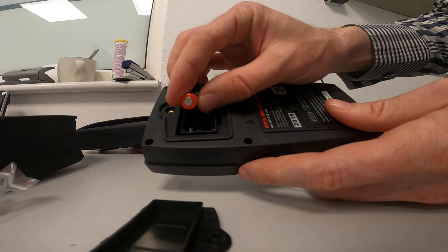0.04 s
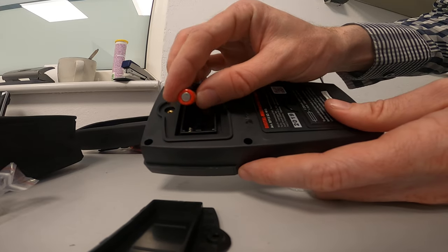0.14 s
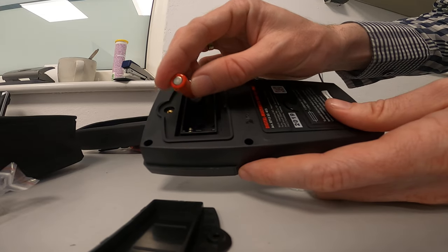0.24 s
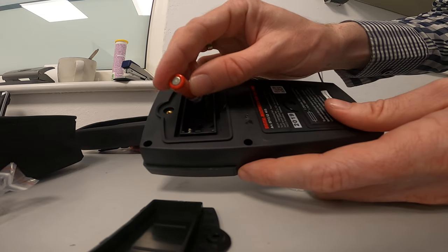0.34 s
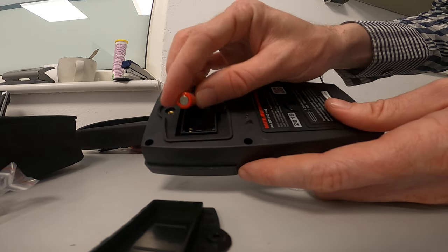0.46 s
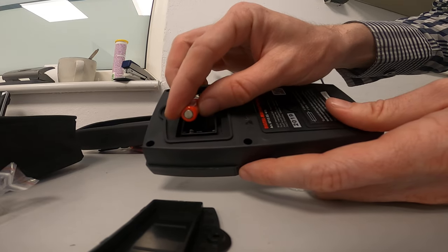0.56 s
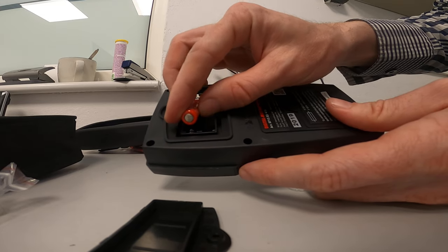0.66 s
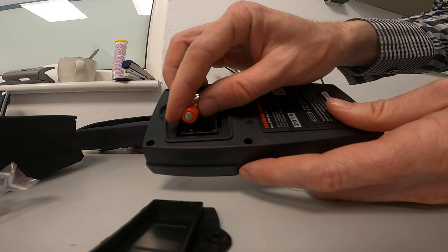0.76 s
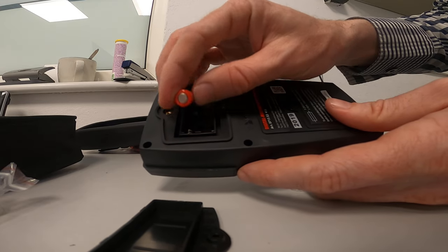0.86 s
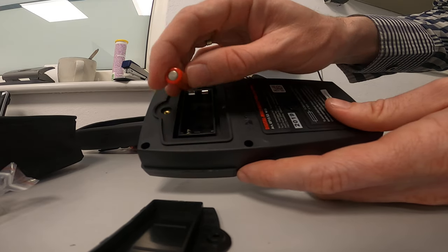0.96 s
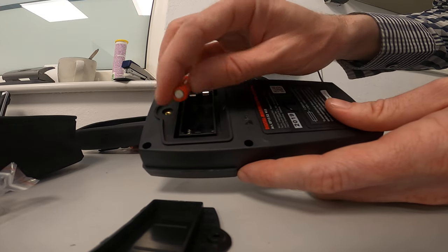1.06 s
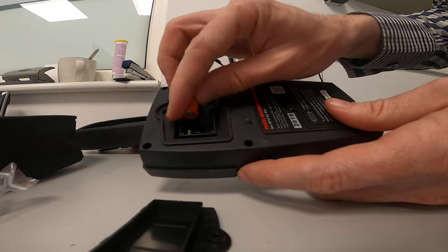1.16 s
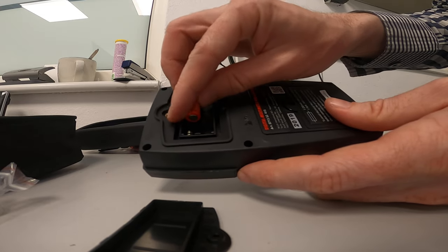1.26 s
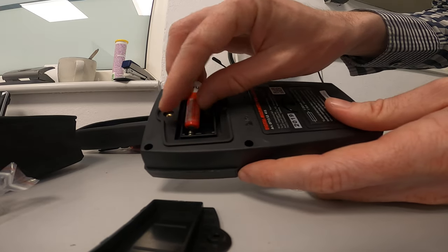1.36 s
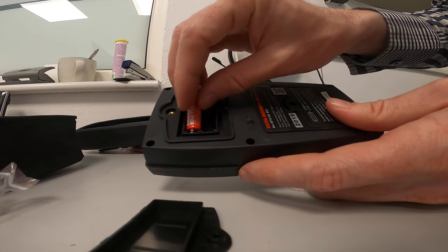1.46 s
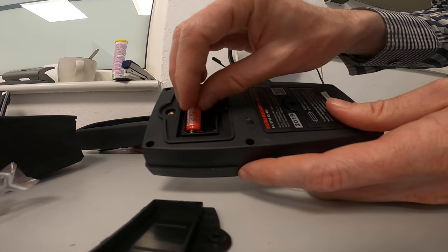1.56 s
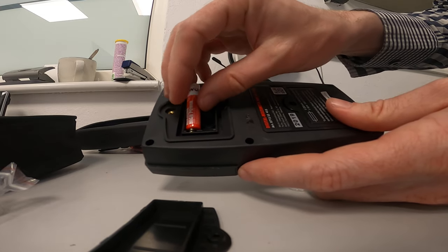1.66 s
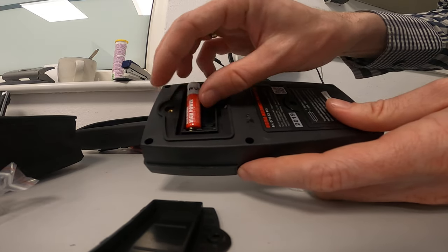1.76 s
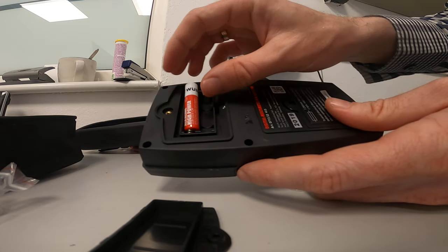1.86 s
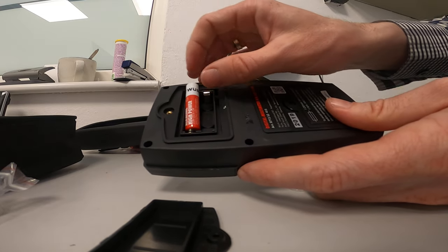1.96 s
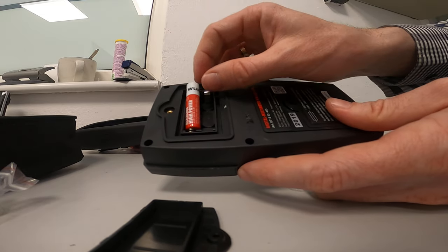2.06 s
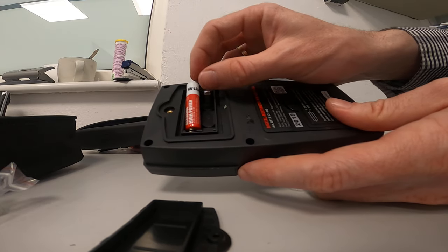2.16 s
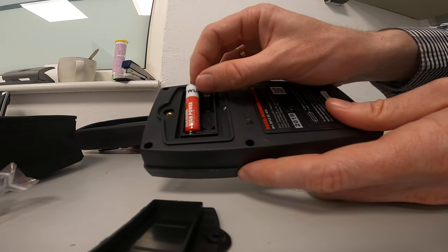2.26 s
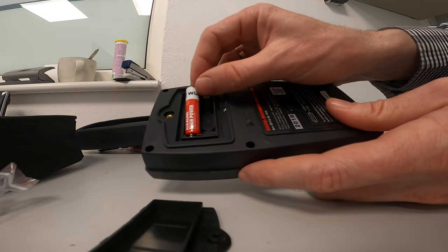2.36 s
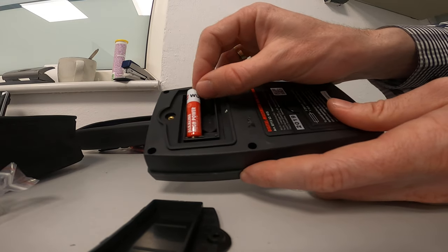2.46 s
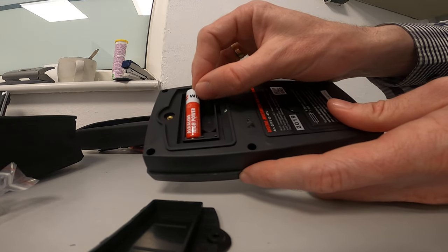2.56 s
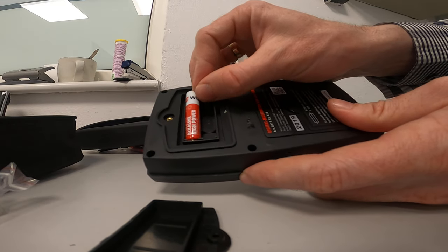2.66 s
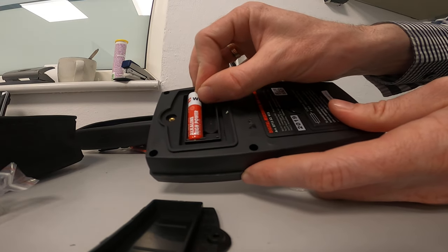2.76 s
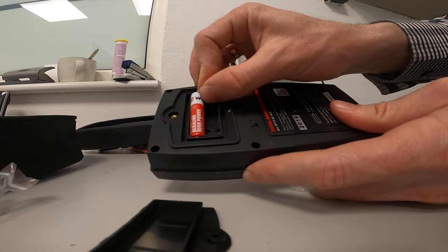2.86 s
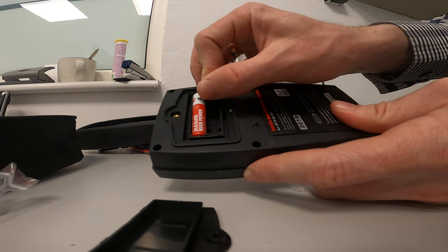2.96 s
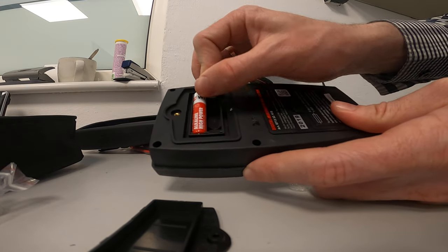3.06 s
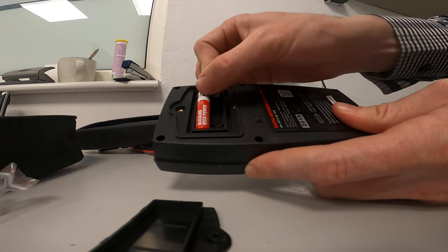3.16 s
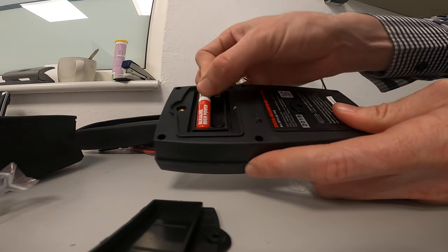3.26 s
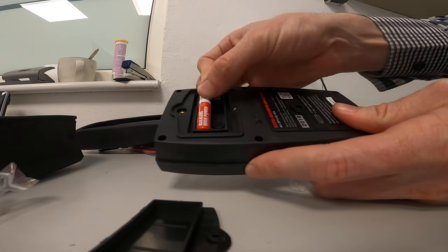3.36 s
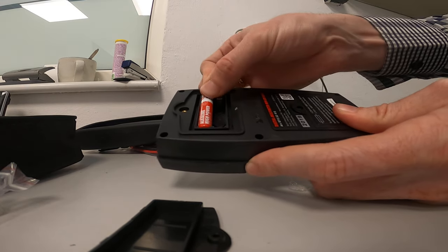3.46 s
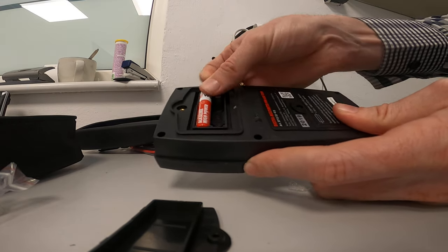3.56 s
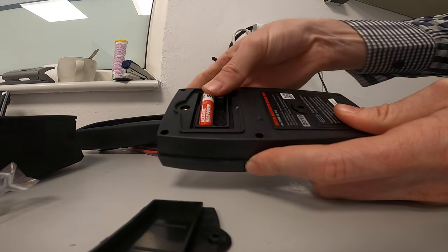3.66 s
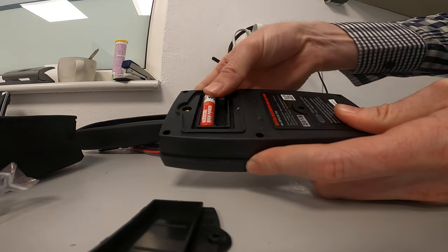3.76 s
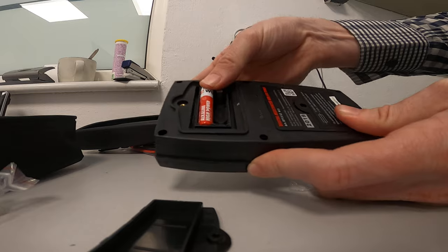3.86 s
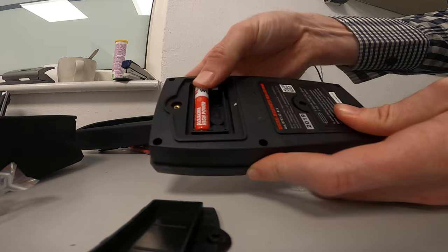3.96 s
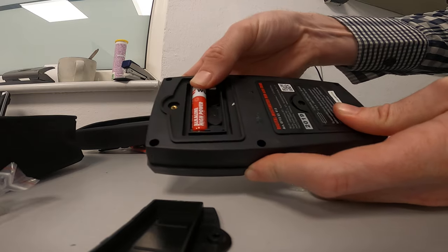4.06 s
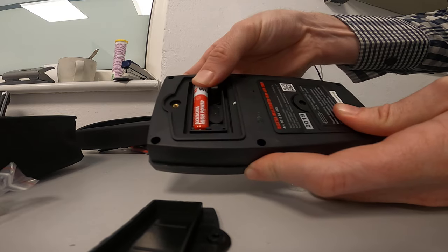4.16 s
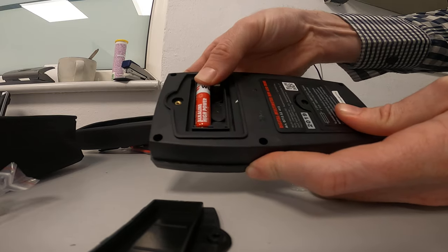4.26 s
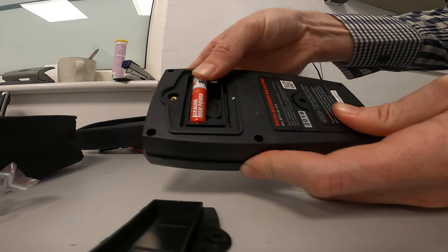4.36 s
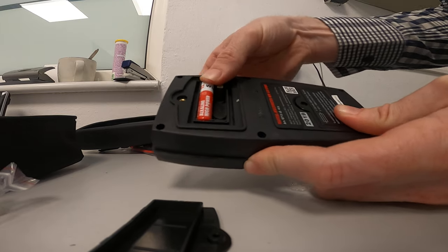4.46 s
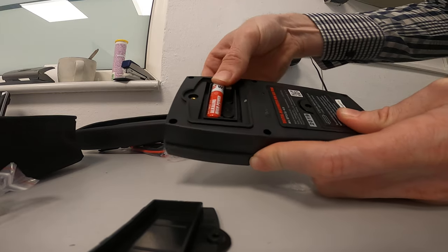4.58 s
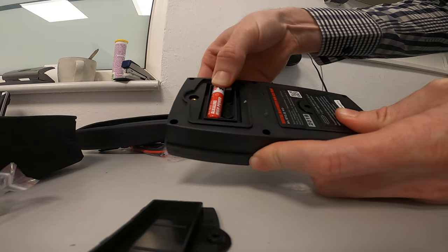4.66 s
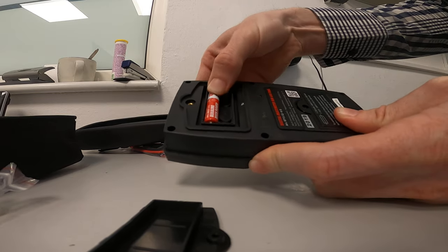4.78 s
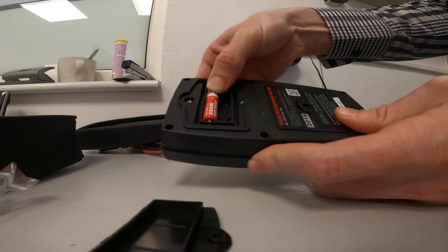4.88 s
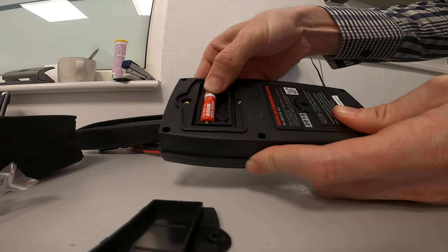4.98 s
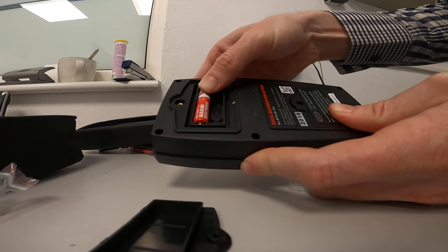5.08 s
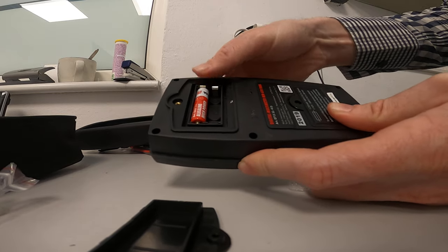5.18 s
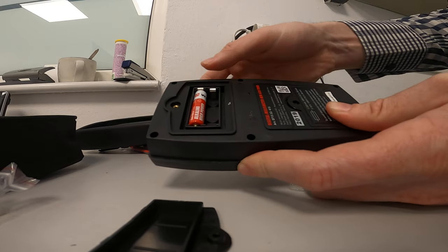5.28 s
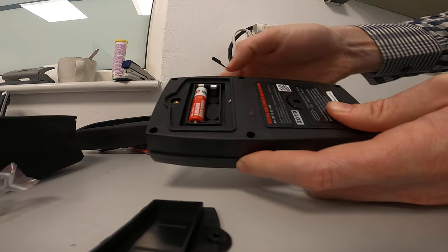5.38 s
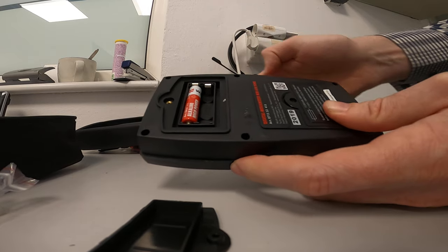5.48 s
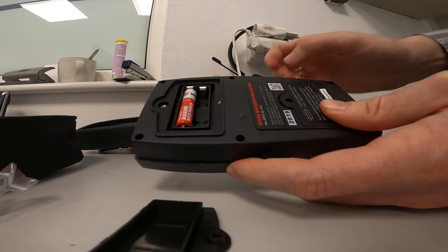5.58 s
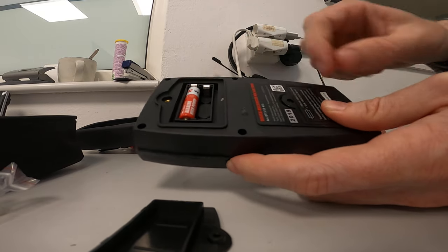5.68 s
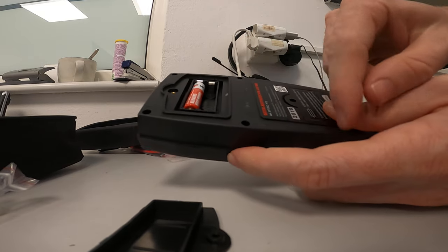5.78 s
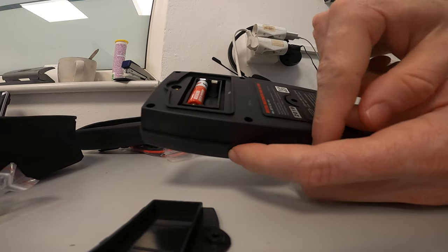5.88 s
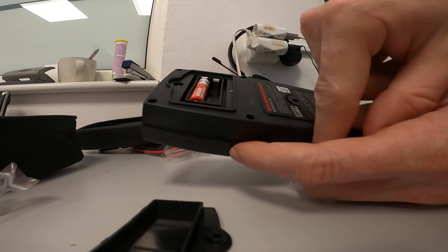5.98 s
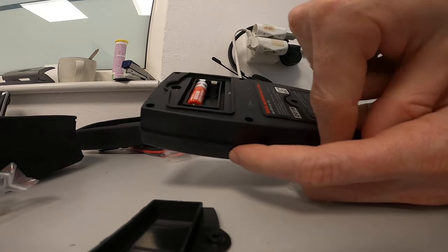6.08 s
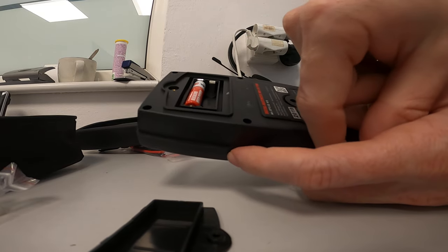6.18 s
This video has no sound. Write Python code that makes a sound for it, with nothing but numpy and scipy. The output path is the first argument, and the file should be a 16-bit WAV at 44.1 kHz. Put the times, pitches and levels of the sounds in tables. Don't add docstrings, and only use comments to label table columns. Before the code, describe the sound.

Low ventilation rumble and faint fan hum fill a small hard room throughout, with a small microphone close by on the desk. A light tap opens, a nail tick follows at 0.1 s, and soft pats come from 0.3 to 0.76. At 0.97 a quick triple knock rings the plastic case. Around 1.34 to 1.57 knocks crowd together into loud clacks with springy rattle, and a harder one hits at 1.85 amid scuffing. Until 2.9 there are only small ticks and rubs. Medium knocks land at 2.95, 3.1 and 3.37, lighter ones at 3.98 and 4.5, with skin and cell dragging between. From 4.87 rapid slips grow into a very loud, sharp snap at 4.91, with a desk thump and short room clap. The level ducks and recovers by about 5.1; soft brushing and faint ticks continue to 6.2.

```python
import sys
import numpy as np
from scipy import signal
from scipy.fft import rfft, irfft, next_fast_len
from scipy.io import wavfile
from scipy.ndimage import uniform_filter1d

SR = 44100
rng = np.random.default_rng(int(sys.argv[2]) if len(sys.argv) > 2 else 0)


def generate_wav(signal):
    frames = np.transpose(np.atleast_2d(signal))
    scaled = np.clip(frames, -1, 1) * 32767
    pcm = np.round(scaled).astype(np.int16)
    wavfile.write(sys.argv[1], SR, pcm)


def field_ratio(decibels):
    return 10 ** (np.asarray(decibels, dtype=float) / 20)


N = 274743
T = np.arange(N) / SR
HZ = np.fft.rfftfreq(N, 1 / SR) + 1e-3
SIDES = np.array([[1], [-1]])
SNAP_S = 4.9095

# pitch in Hz, level in dB, ring time as a factor.
CASE_MODES = [(380, -9, 6.3), (530, -11, 5), (703, -7, 2.6), (772, -10, 2.2), (932, -6.5, 2.8),
              (1060, -4, 2), (1145, 5, 0.8), (1205, 1, 1.1), (1480, 0, 1.1), (1680, 7.5, 0.37),
              (1772, 0, 1.3), (2054, 10, 0.28), (2226, -1.5, 1.2), (2620, -3, 0.47), (2940, 3.5, 0.83),
              (3180, -5, 2), (3702, 6, 0.78), (4180, 6, 0.87), (5100, 7, 0.21), (6788, -6, .2),
              (7460, 17.5, .2), (8150, -10, .15), (10000, -17.5, .1)]


def unit(x):
    return x / np.sqrt(np.mean(x ** 2))


def on_hz(table):
    hz, value = np.transpose(table)
    return np.interp(np.log(HZ), np.log(hz), value)


def on_time(table):
    s, value = np.transpose(table)
    return np.interp(T, s, value)


def bell(hz, octaves):
    return np.exp(-.5 * (np.log2(HZ / hz) / octaves) ** 2)


def band(x, hz, octaves):
    return irfft(rfft(x) * bell(hz, octaves), N)


def band_edges(centre_hz, octaves):
    return centre_hz * 2 ** (octaves * np.array([-1, 1]))


def walk(rate):
    hold = int(SR / rate)
    steps = np.repeat(rng.standard_normal(N // hold + 1), hold)
    return .45 * uniform_filter1d(uniform_filter1d(steps, hold), hold)[:N]


def decay(t, t60):
    return np.exp(-np.log(1000) * t / t60)


def ring(hz, gain, t60, size):
    t = np.arange(size) / SR
    hz, gain, t60 = (np.reshape(v, (-1, 1)) for v in (hz, gain, np.maximum(t60, .002)))
    return np.sum(gain * np.sin(2 * np.pi * hz * t) * decay(t, t60), axis=0)


def case_ring(centre_hz, spread, ring_s, chance):
    hz, db, factor = np.transpose(CASE_MODES)
    distance = np.log2(hz / centre_hz) / max(spread, .15)
    weight = field_ratio(db - 2.84 * distance ** 2 + 2.0 * chance[0])
    sign = (-1) ** np.arange(len(hz)) * np.where(chance[2] > 1.3, -1, 1)
    return ring(hz * (1 + 0.009 * chance[1]), sign * weight, ring_s * factor, size=3072)


def add(out, s, sound):
    i = max(int(s * SR), 0)
    sound = sound[..., :N - i]
    out[..., i:i + sound.shape[-1]] += sound


def pair():
    # pitch in Hz, likeness of left and right from 0 to 1.
    likeness = [(60, 0.96), (130, 0.8), (290, 0.88), (640, 0.5), (1410, 0.4), (3100, 0.01), (6820, 0),
                (15000, 0)]
    alike = np.clip(on_hz(likeness), 0, 1)
    mid, side = rfft(rng.standard_normal((2, N)))
    return np.sqrt(1 + alike) * mid + np.sqrt(1 - alike) * side * SIDES


def air():
    # pitch in Hz, level in dB per Hz.
    hiss_colour = [(53, -26.5), (90, -7.5), (158, 3.5), (222, -7), (282, -6.5), (407, -16.5), (504, -18.5),
                   (562, -21.5), (727, -22), (810, -24), (2050, -26), (3660, -41.5), (7610, -42.5),
                   (15500, -68)]
    # time in seconds, level in dB.
    rumble_swell = [(0, -46), (.68, -44), (1.28, -52), (1.91, -51), (2.46, -50), (2.58, -52.5),
                    (3.14, -48.5), (3.35, -55.5), (3.99, -37), (4.15, -44.5), (4.44, -45), (4.56, -39.5),
                    (4.8, -51), (4.94, -28.5), (5.17, -53.5), (5.29, -45), (5.6, -46), (6.23, -44)]
    rumble_colour = [(8, -9.5), (25, 5.5), (45, 6.5), (65, 6.5), (85, -8.0), (120, -8.0), (200, -77.0)]  # Hz, dB
    noise = pair()
    hiss = unit(irfft(noise * field_ratio(on_hz(hiss_colour)) * (HZ > 80), N))
    rumble = unit(irfft(noise * field_ratio(on_hz(rumble_colour)), N))
    return hiss * field_ratio(-58.5 + 0.57 * walk(4.3)) + rumble * field_ratio(on_time(rumble_swell) + 2.0 * walk(52))


def hum():
    # pitch in Hz, width in Hz, level in dB.
    tones = [
        (147.3, 5.8, -61),
        (203.1, 17, -63.5),
        (12000, 120, -106),
    ]
    out = np.zeros((2, N))
    for hz, width, db in tones:
        out += field_ratio(db + 2.0 * walk(5)) * unit(band(rng.standard_normal(N), hz, width / hz / 2))
    return out


def tiny_slips():
    stronger_db = 2.5 * rng.exponential(size=N) * (rng.random(N) < .05)
    mid, side = rng.standard_normal((2, N)) * field_ratio(stronger_db)
    return (mid + 0.59 * side * SIDES) * field_ratio(1.4 * walk(63))


def case_hum(slips, centre_hz, spread, ring_s):
    still = np.zeros((3, len(CASE_MODES)))
    answer = case_ring(centre_hz, spread, ring_s, still)
    return unit(signal.fftconvolve(slips, [answer])[:, :slips.shape[1]])


def handling(slips, hiss):
    # time in seconds, level in dB.
    busyness = [(0, -63), (.3, -86), (.7, -74), (.95, -90), (1.4, -77), (1.55, -84), (2.0, -70), (2.2, -96),
                (2.45, -100), (2.65, -70), (2.97, -91), (3.09, -69), (3.4, -84.5), (3.92, -65), (4.3, -76),
                (4.8, -68.5), (5.3, -70), (6.23, -76.5)]
    hiss_db = -16
    return field_ratio(on_time(busyness)) * (case_hum(slips, 1500, 0.7, 0.002) + field_ratio(hiss_db) * hiss)


def strokes(slips, hiss):
    # start in seconds, length in seconds, level in dB, centre in Hz.
    drags = [(.318, 0.027, -60.5, 1820), (.882, 0.22, -56.5, 1270), (2.375, 0.041, -60, 750),
             (2.504, 0.053, -62, 990), (2.715, 0.029, -51.5, 1370), (2.762, 0.34, -68, 1100),
             (2.93, 0.046, -57, 1308), (3.386, 0.068, -56, 980), (3.672, 0.06, -57.5, 900),
             (3.886, 0.031, -52, 1300), (4.056, 0.045, -50.5, 1200), (4.246, 0.092, -57, 1012),
             (4.532, 0.0286, -43.5, 1140), (4.615, .12, -51, 1610), (4.714, 0.097, -51.5, 1200),
             (5.915, 0.14, -62, 1050), (1.494, 0.089, -46.5, 1400), (5.93, .06, -66, 1650),
             (1.835, .02, -52.5, 2500), (5.7, .06, -69, 1480)]
    # start in seconds, length in seconds, level in dB, centre in Hz.
    scuffs = [(.47, 0.15, -85, 2480), (.558, 0.15, -70, 1930), (1.776, 0.18, -53, 1420),
              (3.655, 0.041, -51, 2330), (3.854, 0.024, -70.5, 1790), (3.963, 0.033, -49, 2000),
              (4.461, 0.098, -59, 1540), (5.382, 0.17, -69, 1820), (5.52, 0.053, -61.5, 2000),
              (5.97, 0.11, -71, 1490), (1.901, 0.042, -52, 2950)]
    # start in seconds, length in seconds, level in dB, centre in Hz.
    swipes = [(.0, 0.013, -51, 1970), (.799, 0.06, -73, 2470), (.987, 0.077, -65, 2190),
              (1.372, 0.092, -74, 1200), (2.559, .051, -71, 1780), (2.993, 0.037, -73, 1200),
              (3.278, 0.1, -70.5, 1117), (5.303, 0.035, -64.5, 1108), (6.2, 0.042, -62, 2580),
              (.87, 0.033, -82, 2540)]
    out = np.zeros((2, N))
    for table, hiss_db in ((drags, -38), (scuffs, -19.5), (swipes, -5.5)):
        for s, length, db, centre_hz in table:
            span = slice(max(int(s * SR), 0), int((s + max(length, .01)) * SR))
            body = case_hum(slips[:, span], centre_hz, .4, .012)
            swell = np.hanning(body.shape[1]) ** 0.56
            out[:, span] += swell * field_ratio(db) * (body + field_ratio(hiss_db) * hiss[:, span])
    return out


def brushes(slips):
    # start in seconds, length in seconds, level in dB, centre in Hz, width in octaves.
    passes = [(0.98, .075, -72, 10700, .35), (1.39, .05, -78, 8100, .2), (1.4984, 0.082, -66, 7200, 0.13),
              (1.774, 0.032, -68.5, 8000, .15), (1.9, 0.04, -66, 8700, 0.15), (5.92, 0.17, -80, 11500, .4),
              (5.9, 0.22, -75, 6500, 0.6), (4.93, .21, -41, 110, .6), (5.04, .15, -47, 1000, .15),
              (5.04, .17, -47, 1680, .1), (5.92, .1, -66, 1050, .06), (3.82, .08, -78, 7000, .6),
              (.8, .05, -76.5, 5000, .12), (.87, .05, -76.5, 5200, .15), (.875, .04, -80, 8000, .12),
              (1.0, .07, -72, 5300, .15), (1.55, .03, -58.5, 7700, .1), (3.385, .1, -74, 6800, .25),
              (2.6, .17, -57, 350, 0.53), (5.68, 0.083, -60.5, 340, 0.5), (0.49, 0.23, -71, 2370, 0.42),
              (1.85, 0.28, -56, 1800, .25), (1.86, .16, -68, 4800, .35), (4.758, .04, -53, 750, .2),
              (4.48, .03, -68, 7000, .15), (4.63, .09, -72, 7900, .08), (3.88, .2, -64, 700, .25),
              (0, .03, -58, 320, .2), (3.45, 0.9, -86, 7800, .06), (4.27, 0.067, -74, 7800, .08),
              (2.7, 0.046, -76, 8400, .1), (5.92, 0.056, -73, 1300, 0.27)]
    out = np.zeros((2, N))
    for s, length, db, centre_hz, octaves in passes:
        edges = np.minimum(band_edges(centre_hz, octaves), [15000, 16000])
        around = signal.butter(4, edges, "band", fs=SR, output="sos")
        rub = unit(signal.sosfilt(around, slips[:, int(s * SR):int((s + length) * SR)]))
        add(out, s, field_ratio(db) * rub * np.hanning(rub.shape[1]) ** 0.93)
    return out


def rattles(slips):
    # start in seconds, level in dB, centre in Hz, width in octaves, ring time in seconds.
    shaken = [(0, -62, 5400, .045, .3), (0, -66, 7000, .25, .2), (.35, -72, 5750, .04, .25),
              (3.11, -58, 2600, .3, .25), (.975, -54, 3000, .06, .3), (1.86, -50, 1700, .2, .3),
              (4.55, -54, 800, .3, .12), (3.11, -54, 1050, .15, .3), (3.38, -68, 6200, .12, .4),
              (1.575, -50, 760, .1, .2), (1.455, -54, 800, .2, .08)]
    out, size = np.zeros((2, N)), 16384
    for s, db, centre_hz, octaves, ring_s in shaken:
        i = int(s * SR)
        around = signal.butter(2, band_edges(centre_hz, octaves), "band", fs=SR, output="sos")
        rattle = unit(signal.sosfilt(around, slips[:, i:i + size]))
        add(out, s, field_ratio(db) * rattle * decay(T[:size], ring_s))
    return out


def rubbing():
    slips = tiny_slips()
    hiss = unit(band(slips, 5300, 0.54) + 0.5 * band(slips, 7100, 0.095))
    return handling(slips, hiss) + strokes(slips, hiss) + brushes(slips) + rattles(slips)


def desk_wobble(t):
    rest_hz, extra_hz, settle_s, ring_s = 29, 58, .015, .42
    turns = rest_hz * t + extra_hz * settle_s * (1 - np.exp(-t / settle_s))
    return np.sin(2 * np.pi * turns) * decay(t, ring_s)


def jolts():
    # start in seconds, level in dB, left minus right in dB.
    pushes = [
        (0.97, -51, 3),
        (2.954, -41, -2),
        (3.373, -42, 1.5),
        (3.976, -54, 3),
        (4.513, -52, -2),
        (4.9125, -24, -15.5),
    ]
    # pitch in Hz, level in dB, ring time in seconds.
    desk_modes = [(140, 3.5, 0.033), (205, 3.5, 0.017), (330, -9.5, 0.025)]
    pan_share = [1.5, 0.91, 1.2]
    out, t = np.zeros((2, N)), T[:20000]
    hz, db, t60 = np.transpose(desk_modes)
    wobble = desk_wobble(t)
    wobble_db, wobble_pan_share = -0.5, .45
    for s, jolt_db, pan_db in pushes:
        side_db = pan_db / 2 * np.array(pan_share)
        both = np.array([ring(hz, field_ratio(jolt_db + db + sign * side_db), t60, size=len(t)) for sign in (1, -1)])
        both = both + wobble * field_ratio(jolt_db + wobble_db + pan_db / 2 * wobble_pan_share * SIDES)
        add(out, s, both * (1 - np.exp(-t / 0.00057)))
    return out


def nudges():
    # start in seconds, peak in dB, centre in Hz, crack in dB.
    soft = [(.5288, -54.5, 2400, -29), (.643, -39, 2270, -30), (.673, -46, 2000, -20),
            (.7589, -51.5, 1570, -23), (1.3447, -29, 913, -56), (1.465, -41.5, 1120, -13),
            (1.5086, -38.5, 1270, -20.5), (2.7734, -52, 1123, -19.5), (3.2117, -47, 1102, -35),
            (3.309, -49.5, 1170, -16), (4.4886, -38.5, 1213, -40), (4.6398, -41, 1742, -24),
            (5.4205, -52, 1900, -20)]
    return [(*row, 0.042, .23) for row in soft]


def pats():
    # start in seconds, peak in dB, centre in Hz, crack in dB.
    loose = [(.0039, -38, 1800, -4), (.3012, -49, 1360, -33), (.346, -42.5, 1610, -8),
             (.6209, -46.5, 1530, -45), (2.5997, -45.5, 2200, -24), (2.733, -40.5, 1290, -30),
             (3.0546, -40, 1200, -37), (3.084, -42, 1334, -20), (3.6745, -40.5, 2640, -4.5),
             (3.904, -40, 1420, -17), (4.0713, -42, 1200, -13), (4.7656, -39, 1840, -15),
             (5.542, -47.5, 1980, -11.5), (5.551, -56, 1860, -16)]
    return [(*row, 0.05, 0.55) for row in loose]


def nail_ticks():
    # start in seconds, peak in dB, centre in Hz, crack in dB.
    nails = [(.1131, -35.5, 2080, -18.5), (1.0498, -46, 2800, -4), (1.48, -42, 1745, -12),
             (1.79, -48, 1451, -12), (1.809, -45, 2204, -1.5), (2.2771, -58, 2053, -9),
             (2.3862, -59, 1350, -5.5), (2.8739, -53, 4120, 5.5), (3.5653, -44.5, 1840, -13),
             (3.7317, -50, 1766, -8), (4.4738, -54, 2300, -9), (4.698, -45.5, 2143, -3.5),
             (4.7345, -46, 2064, -7.5), (4.7487, -42, 1300, -14), (4.7826, -37, 1373, -27),
             (4.9062, -16, 1250, -12), (4.921, -35, 3205, -12), (2.57, -63, 3980, 5),
             (5.6984, -49, 1890, -14), (5.832, -51.5, 1750, -12), (5.9823, -54, 1827, -9),
             (6.137, -58.5, 2000, -18.5)]
    return [(*row, 0.0078, 1) for row in nails]


def cell_knocks():
    # start in seconds, peak in dB, ringing centre in Hz, crack in dB, hardness as spread in octaves.
    blows = [(0.9695, -20, 2280, -14.5, 0.28), (0.982, -22.5, 1660, -14, 0.39),
             (0.9895, -26.5, 1730, -22, 0.41), (1.3388, -29, 1125, -26.5, 0.3),
             (1.4484, -30, 1390, -29, 0.73), (1.5227, -28.5, 1550, -16, 0.85),
             (1.54, -14.5, 1150, -27, 0.34), (1.5485, -17.5, 1350, -36, 0.63),
             (1.5698, -11, 2100, -25.5, .59), (1.8529, -7, 2234, -23.5, 0.48),
             (2.9519, -30, 2000, -21, 0.83), (2.9552, -27.5, 1140, -22, 0.6),
             (3.1055, -21.5, 2000, -22, 0.61), (3.3718, -20.5, 1505, -11.5, 0.84),
             (3.9757, -28.5, 2065, -13.5, 0.83), (4.5048, -28.5, 2350, -5.5, 0.58),
             (4.5117, -22.5, 1360, -25, 0.68), (4.5382, -26.5, 2240, -9.5, 1.03)]
    ring_s, loss_s_per_octave = 0.04, 0.032
    return [(*blow[:4], ring_s - loss_s_per_octave * blow[4], blow[4]) for blow in blows]


def slips_and_snap():
    # peak in dB, centre in Hz, crack in dB, ring time in seconds (below zero: shortest), spread in octaves.
    home = (-2.5, 2500, -11, -0.3751, 0.83)
    gap_s, growth_db = .0107, 12
    rows = [(SNAP_S - k * gap_s, home[0] - k * growth_db, 2400, -13.5, 0.01, 0.68) for k in (1, 2, 3, 4)]
    return rows + [(SNAP_S, *home)]


def taps():
    out, t = np.zeros((2, N)), np.arange(3072) / SR
    treble = signal.butter(2, [3000, 9200], "band", fs=SR, output="sos")
    spray, onset = np.exp(-t / .012), .05 + np.exp(-t / .0014)
    contacts = cell_knocks() + nail_ticks() + pats() + nudges() + slips_and_snap()
    for s, peak_db, centre_hz, crack_db, ring_s, spread in contacts:
        chance = rng.standard_normal((3, len(CASE_MODES)))
        grit = rng.standard_normal(len(t))
        push = np.hanning(3 + int(.45 * SR / centre_hz))
        body = np.convolve(case_ring(centre_hz, spread, ring_s, chance), push)[:len(t)]
        small = signal.butter(3, 0.31 * centre_hz, "high", fs=SR, output="sos")
        body = signal.sosfilt(small, body)
        body = body / np.abs(body).max()
        crack = signal.sosfilt(treble, grit * np.exp(-t / (0.0016 + 0.047 * max(ring_s, 0))))
        crack = field_ratio(crack_db + 3.0) * crack / np.abs(crack).max()
        smooth_crack = unit(signal.sosfilt(treble, grit * spray)) * crack.std()
        add(out, s, field_ratio(peak_db) * np.array([body + crack, body * onset + smooth_crack]))
    return out


def spring_rings():
    # start in seconds, level in dB, pitch in Hz, ring time in seconds.
    twangs = [(.004, -61, 5390, 0.25), (.346, -70, 5720, 0.19), (1.57, -26, 1200, .022),
              (1.57, -34, 4000, .025), (1.571, -39, 2870, .06), (1.549, -36, 2300, .03),
              (1.541, -38, 2900, .025), (1.55, -41, 760, .1), (1.51, -52, 2200, .06),
              (4.867, -54, 7700, .008), (4.9105, -26, 450, .012), (4.9098, -24, 2030, .012),
              (4.9064, -32, 10000, .005), (2.957, -48, 730, .03), (2.956, -42, 1130, .025),
              (3.084, -52, 1150, .02), (1.34, -45, 530, .09), (1.34, -38, 1450, .03),
              (1.854, -45, 3740, .09), (1.854, -46.5, 900, 0.097), (1.854, -44.5, 1100, 0.061),
              (1.853, -30, 2500, 0.018), (1.853, -30, 3850, 0.013), (1.854, -35.5, 1740, 0.051),
              (3.374, -43.5, 930, 0.08), (4.877, -57, 7950, .15), (4.888, -46, 7950, 0.16),
              (4.899, -41.5, 7950, 0.1), (4.9097, -12, 7480, 0.007), (4.9098, -24, 9900, 0.0087),
              (4.9108, -16, 3300, 0.0057), (4.9106, -17, 1800, 0.012), (4.9064, -23, 7600, 0.007),
              (4.9064, -14, 1050, 0.012), (4.9097, -14, 1513, 0.0059), (4.8955, -37.5, 1200, .008),
              (4.9098, -30, 11500, 0.005), (4.9097, -12.5, 2840, 0.01), (1.8532, -22, 2130, 0.017),
              (3.1056, -39, 2640, 0.018), (3.372, -34.5, 10000, 0.0043), (.9697, -30, 2950, .022),
              (.959, -52, 2900, .012), (.949, -59, 2900, .012), (.1135, -45, 2100, .025),
              (.004, -50, 3650, .025), (4.7657, -47, 2600, .012), (3.1058, -33, 1150, .02),
              (3.1058, -39, 3300, .012), (1.34, -41, 1140, .07), (1.345, -46, 770, .1),
              (3.372, -48, 12500, .003)]
    out = np.zeros((2, N))
    for s, db, hz, t60 in twangs:
        partials = hz * np.array([.991, 1, 1.005])
        twang = field_ratio(db) * ring(partials, [.4, 1, .45], [t60] * 3, size=256 + int(t60 * SR))
        room_db = 0 if abs(s - SNAP_S) < .01 else -4
        add(out, s, twang * field_ratio([[0], [room_db]]))
    return out


def snap_to_walls(far):
    # pitch in Hz, level in dB.
    clap_colour = [(300, -15), (720, -5), (980, 0), (1250, -8), (1650, 3.5), (2200, -8), (2800, -4),
                   (3750, -5), (4500, -13.5), (5500, -4), (6600, -12), (7600, -12.5), (9000, -24),
                   (14000, -28)]
    at_snap = np.abs(T - SNAP_S - .005) < .01
    clap = irfft(field_ratio(on_hz(clap_colour)) * np.exp(-2j * np.pi * HZ * SNAP_S), N)
    level = field_ratio(-3) * np.linalg.norm(far * at_snap) / np.linalg.norm(clap)
    return far * ~at_snap + level * clap


def room(x):
    # pitch in Hz, level in dB, time to fall 60 dB in seconds.
    tail_bands = [(296, -40.5, 0.54), (645, -37, 0.52), (1200, -47.5, 0.67), (2000, -49, 0.62),
                  (3500, -54.5, 0.51), (5200, -48, 0.53), (7400, -58.5, 0.32), (10500, -68, 0.22),
                  (13500, -69, 0.2)]
    noise, size, t = pair(), next_fast_len(N + SR), T[:SR]
    tail = np.zeros((2, SR))
    for hz, db, t60 in tail_bands:
        tail += field_ratio(db) * irfft(noise * bell(hz, .4), N)[:, :SR] * decay(t, t60)
    tail = tail * (1 - np.exp(-t / 0.0026))
    return irfft(rfft(x, size) * rfft(tail, size), size)[:, :N]


def at_ports(near):
    # pitch in Hz, left minus right in dB.
    tilt = [(300, 2), (700, -3.5), (1300, -2.5), (2400, 1.5), (4400, -3.5), (8100, -6.5), (15000, -4)]
    direct = irfft(rfft(near) * field_ratio(on_hz(tilt) / 2 * SIDES), N)
    direct[:, -2048:] = 0
    direct[0] = np.roll(direct[0], 2)
    return direct


def duck():
    start_s, attack_s = 4.898, .014
    rest_db, duck_db, recover_db_per_s = -1.67, -21.5, 92.5
    down_s = start_s + attack_s
    back_s = down_s + (rest_db - duck_db) / recover_db_per_s
    return field_ratio(np.interp(T, [start_s, down_s, back_s], [rest_db, duck_db, rest_db]))


def scene():
    lift = 1 / duck()
    near, far = lift * (taps() + spring_rings())
    desk = lift * jolts()
    wet = room(snap_to_walls(far) + field_ratio(-6.5) * band(desk[1], 360, 0.22))
    return air() + hum() + rubbing() + wet + desk + at_ports(near)


def top_cut(x):
    return signal.sosfilt(signal.butter(12, 16250, fs=SR, output="sos"), x)


def record(dry):
    x = np.clip(dry * duck(), -.89, .89)
    capsule = signal.butter(3, 14000, fs=SR, output="sos")
    return top_cut(signal.sosfilt(capsule, x))


dry = scene()
out = record(dry)
generate_wav(out)
```